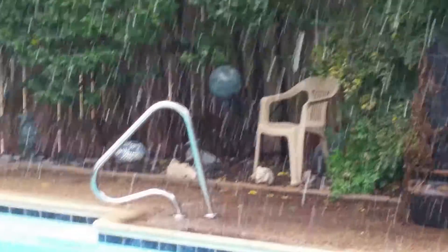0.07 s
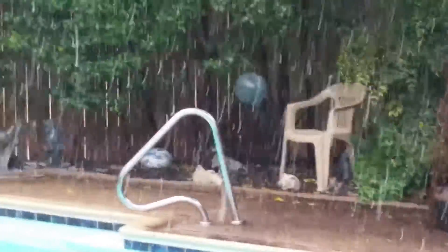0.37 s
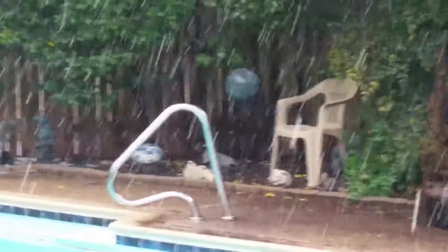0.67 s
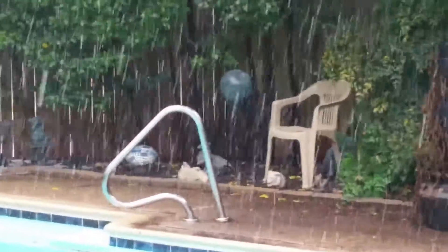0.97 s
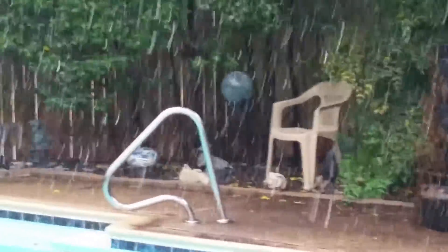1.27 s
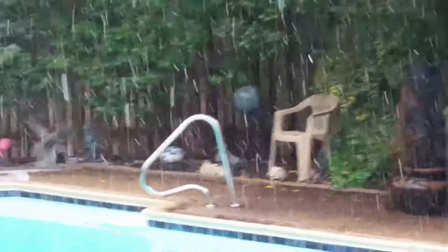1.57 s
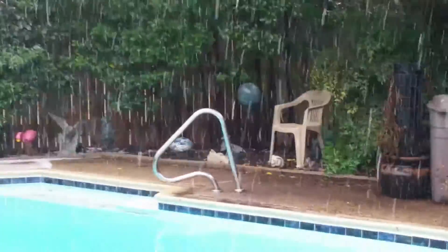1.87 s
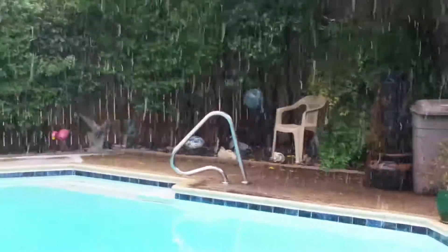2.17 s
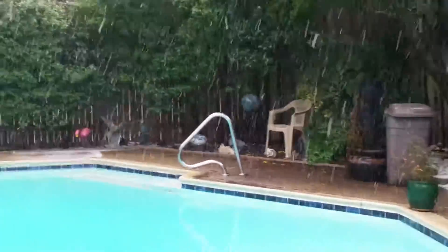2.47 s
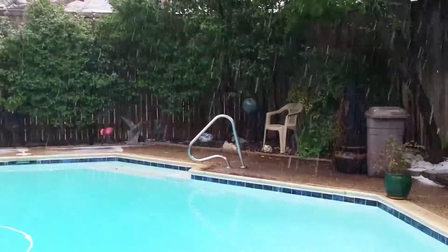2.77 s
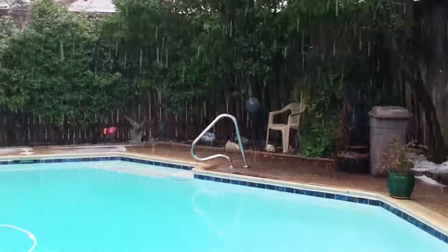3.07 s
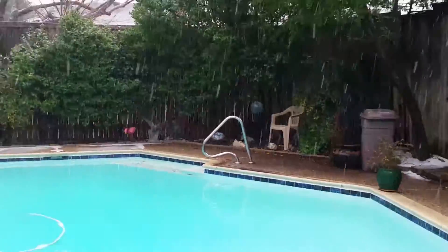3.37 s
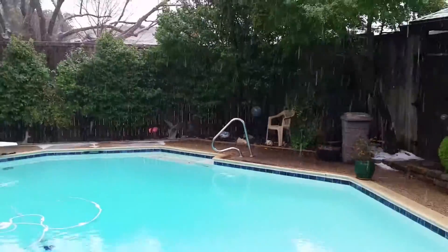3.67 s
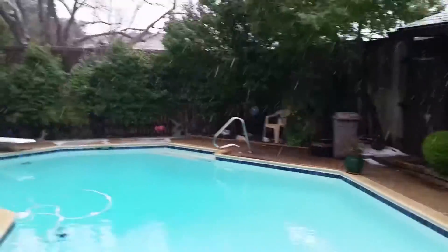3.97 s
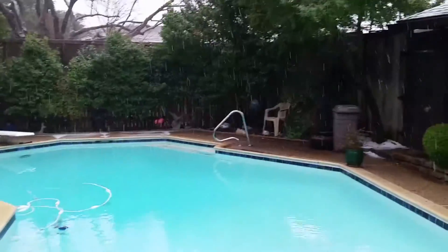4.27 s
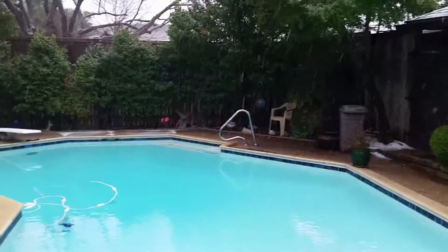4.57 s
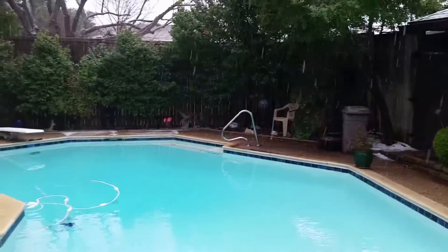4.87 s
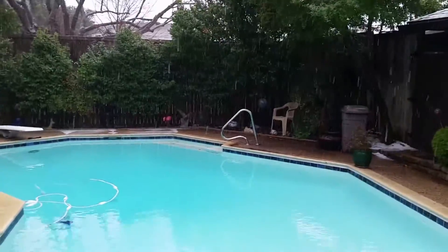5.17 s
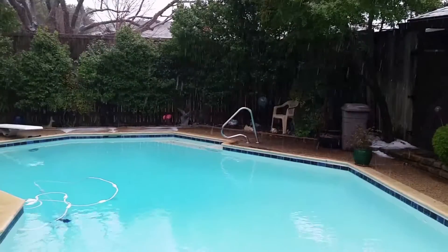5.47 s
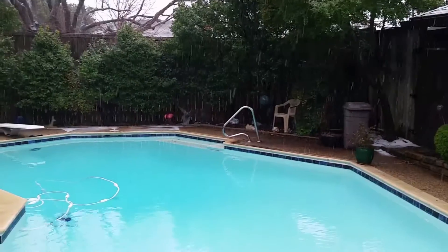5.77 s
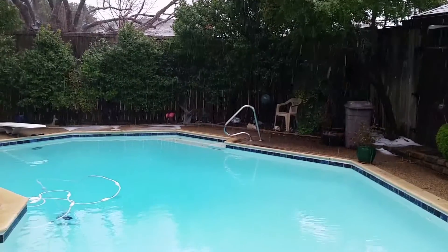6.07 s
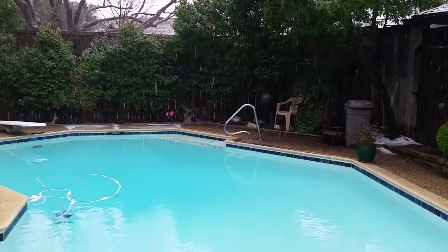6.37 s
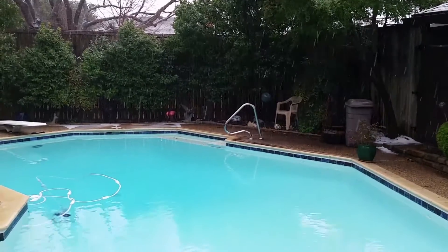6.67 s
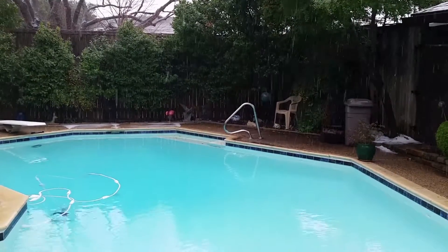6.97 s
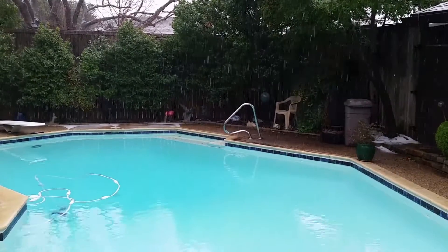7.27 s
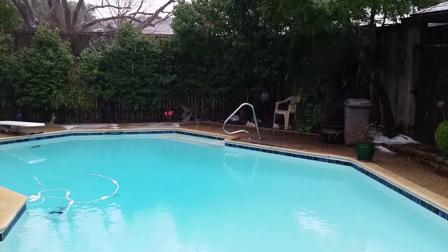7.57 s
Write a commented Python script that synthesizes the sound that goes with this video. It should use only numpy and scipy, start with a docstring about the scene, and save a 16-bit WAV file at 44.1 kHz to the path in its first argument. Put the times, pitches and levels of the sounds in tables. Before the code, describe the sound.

A quiet backyard ambience fades in: tiny ticks and splashes of sleet on leaves and water, with distant motors droning underneath. Two pops hit the microphone on the left, and the hiss dips for about a second. Dull knocks and finger scuffs on the camera follow in the middle and again near the end, while the patter carries on with occasional nearby drips and a faint high whine.

```python
"""A backyard with pool, deck and hedges in wet snow, over the rumble and hum of distant machines.
Flakes patter and splash as tiny damped ticks in a noise wash, ice grains fizz, a few near drops land.
The sound fades in and sinks for a second in the middle. Two drops pop on the left microphone,
a hand bumps and rubs the camera, and a thin electronic whine comes and goes."""
import sys
import numpy as np
from scipy import signal
from scipy.fft import rfft, irfft
from scipy.io import wavfile

SR = 44100
rng = np.random.default_rng(int(sys.argv[2]) if len(sys.argv) > 2 else 0)


def digitize_waveform(pressure):
    """Quantize a signal to 16-bit integers and store it at the path in sys.argv[1].

    Rows of a 2-D input are taken as channels; values are limited to [-1, 1].
    """
    field = np.atleast_2d(pressure).T
    bounded = np.clip(field, -1, 1)
    quanta = np.round(bounded * 32767).astype(np.int16)
    wavfile.write(sys.argv[1], SR, quanta)


N = 344862
T = np.arange(N) / SR

# treble contour that the steady layers follow: t/s, level/dB
HUSH_CONTOUR = np.vstack([[(0.45, -70.5)], [(0.8, -61.5), (2.27, -58.5), (2.28, -62)], [(2.33, -67),
                (2.39, -64.5), (3.04, -80.5), (3.3, -67), (3.74, -61.5), (3.94, -61), (4.33, -59.5),
                (4.6, -59)], [(5.0, -59), (5.3, -57.5), (7.7, -57.5)]])
# distant rumble, relative spectrum: f/Hz, left/dB, right/dB
RUMBLE_SPECTRUM = [(10, -20, 0), (33.6, -4.5, -24), (63, 0.5, -3), (95, -7, 1.5), (119, -3, 0),
                   (163.6, -9.5, -8.5), (197, -13, -10), (230, -5.5, -3), (273, -9.5, -9.5),
                   (371, -18.5, -18.5), (590, -51, -17), (1500, -100, -86)]
# motor tones: f/Hz, level/dB, waver/Hz
HUM_TONES = [(118.3, -52.5, 3.96), (225, -58, 4.17), (341, -63.5, 5.11), (660, -62, 7.96),
             (1997, -67.5, 18), (2280, -69.5, 11.9), (3910, -75.5, 1.65)]
# electronic whine, before hush and pan: t/s, level/dB
WHINE_CONTOUR = [(1.1, -62), (1.38, -75), (2.0, -67), (2.7, -58), (3.05, -68), (3.68, -59), (3.92, -79),
                 (4.5, -72), (4.85, -63), (5.32, -60), (5.45, -70), (5.85, -67), (6.07, -55), (6.35, -74),
                 (6.48, -53.5), (6.65, -74), (7.2, -72), (7.7, -59)]
# soft camera bumps: t/s, left/dB, right/dB, f/Hz
CAMERA_BUMPS = [(1.245, -30, -29.5, 75), (3.596, -21, -50, 102), (3.997, -26, -35, 121),
                (4.56, -33, -31, 215), (4.655, -24, -46, 517), (4.866, -30, -19, 179),
                (6.843, -32, -31, 172), (6.971, -39, -33, 80), (7.69, -30, -26.5, 100)]
# rubbed camera shell, relative spectrum: f/Hz, left/dB, right/dB
SHELL_SPECTRUM = [(59, -29, 5), (195, -6, 10.5), (492, 0.5, -1), (690, -19, -5.5), (1030, -7, -4.5),
                  (1640, -7.5, -13.5), (2300, -23, -28), (3520, -23, -25), (5040, -37, -27),
                  (8000, -55, -35), (12500, -60, -50)]
# finger strokes on the shell: t/s, level/dB, rise/s, hold/s, decay/s, left minus right/dB
FINGER_STROKES = [(4.636, -31, 0.0014, 0.016, 0.016, 8), (4.7, -44, 0.0085, 0.019, 0.027, 0),
                  (4.786, -44.5, 0.024, 0.024, 0.028, 6.5), (4.839, -40, 0.02, 0.042, 0.027, -3.5),
                  (6.8, -47.5, .03, 0.058, .03, 0)]
# drops on the left microphone: t/s, step level/dB, rise/s
PORT_DROPS = [(0.962, -9, 0.0019), (2.3048, 3, 0.00034)]
# icy fizz as each port colours it, relative spectrum: f/Hz, left/dB, right/dB
FIZZ_SPECTRUM = [(1500, -39, -18), (3240, 2, 2), (3930, 3, -1.5), (5500, -5, 0.5), (5920, -36, -11),
                 (6650, 0.5, -0.5), (6960, 3, -4), (9060, 0.5, -9.5), (9300, -5.5, -29), (10650, -0.5, -11),
                 (10980, -19, -5), (12180, 3, 7.5), (14200, -4.5, 7.5), (14600, -3.5, -0.5)]
# fine splashes, before gain and hush: t/s, level/dB
FLURRY_CONTOUR = [(0.6, -57), (2.25, -58), (3.1, -63), (3.35, -52), (3.6, -57.5), (3.95, -53),
                  (4.95, -57.5), (5.27, -49.5), (5.45, -57.5), (5.8, -52.5), (6.5, -58), (6.65, -53.5),
                  (6.9, -62), (7.7, -58.5)]
# single near drops: t/s, level/dB, f/Hz
NEAR_DRIPS = [(1.497, -41, 2830), (3.897, -46, 2900), (4.728, -54, 7200), (5.96, -46, 3310),
              (6.23, -47, 3650), (7.476, -48, 3300), (7.583, -45, 2940)]
# wet flakes on leaves and water, relative spectrum: f/Hz, left/dB, right/dB
PATTER_SPECTRUM = [(100, -32, -20), (283, -6, -5), (495, 2, 1.5), (696, 0.5, -7), (900, -4, -4.5),
                   (1120, -6, -10.5), (1640, -2, -6.5), (2120, -3.5, -25), (2720, -8, -8.5),
                   (2665, -2.5, -4.5), (3090, -15, -33), (4500, -38, -43), (9000, -80, -70)]


def amp(db):
    """Decibels to gain."""
    return 10 ** (np.asarray(db) / 20)


def unit_rms(x):
    """Scales to rms 1."""
    return x / np.sqrt(np.mean(x ** 2) + 1e-20)


def add(mix, start_s, sound):
    """Mixes a stereo sound in at start_s."""
    part = mix[:, round(start_s * SR):][:, :sound.shape[1]]
    part += sound[:, :part.shape[1]]


def drift(rate_hz):
    """Random wander below about rate_hz, rms 1."""
    rolloff = 1 + (np.fft.rfftfreq(N, 1 / SR) / rate_hz) ** 4
    return unit_rms(irfft(rfft(rng.standard_normal(N)) / rolloff, N))


def noise_pair(shared, lag_samples=0):
    """Stereo white noise; a share of the power is common and lags on the right."""
    common = rng.standard_normal(N)
    coherent = np.array([common, np.roll(common, lag_samples)])
    return np.sqrt(shared) * coherent + np.sqrt(1 - shared) * rng.standard_normal((2, N))


def coloured(x, spectrum):
    """Gives each channel its spectrum; mid signal at rms 1."""
    hz, *sides_db = np.transpose(spectrum)
    log_hz = np.log(np.fft.rfftfreq(N, 1 / SR) + 1)
    gains = amp([np.interp(log_hz, np.log(hz), side_db) for side_db in sides_db])
    out = irfft(rfft(x) * gains, N)
    return out / out.mean(0).std()


def hush(follow, full_db=-57.5):
    """Gain that follows a share of the treble contour's dips below full_db."""
    return amp(follow * (np.interp(T, *np.transpose(HUSH_CONTOUR)) - full_db))


def rumble(gain_db=-41.0, lumpy_db=0.98):
    """Far traffic and light wind, nearly alike at both microphones."""
    roar = coloured(noise_pair(shared=0.86, lag_samples=17), RUMBLE_SPECTRUM)
    return amp(gain_db + lumpy_db * drift(3.0)) * hush(follow=0.43) * roar


def hum(waver_db=2.5, balance_db=2.0):
    """Wavering tones of a distant motor; higher ones sink deeper with the hush."""
    tones = np.zeros(N)
    for hz, db, waver_hz in HUM_TONES:
        follow = np.interp(hz, [HUM_TONES[0][0], HUM_TONES[-1][0]], [0.38, 0.75])
        turns = np.cumsum(hz + waver_hz * drift(7.99)) / SR
        tones += amp(db + waver_db * drift(5.3)) * np.sin(2 * np.pi * turns) * hush(follow)
    return np.sqrt(2) * tones * amp([[-balance_db], [balance_db]])


def whine(hz=13921, wander_hz=5, flutter_db=2.3, left_db=-5, right_db=7):
    """Thin fluttering tone of the electronics, mostly right."""
    turns = np.cumsum(hz + wander_hz * drift(3.5)) / SR
    level_db = np.interp(T, *np.transpose(WHINE_CONTOUR)) + flutter_db * drift(19)
    tone = np.sqrt(2) * np.sin(2 * np.pi * turns)
    return amp(level_db) * hush(follow=1) * tone * amp([[left_db], [right_db]])


def bump(peak_s, left_db, right_db, hz, width_cycles=0.68):
    """Dull push on the camera, no ring. Returns start time and sound."""
    t = np.arange(-2048, 2048) / SR
    push = -np.cos(2 * np.pi * hz * t) * np.exp(-(t * hz / width_cycles) ** 2)
    return peak_s + t[0], amp([[left_db], [right_db]]) * push


def scuffs(rough_db=0.5):
    """Skin slips unevenly on the camera shell."""
    rub = coloured(noise_pair(shared=0.12) * amp(rough_db * drift(170)), SHELL_SPECTRUM)
    strokes = np.zeros((2, N))
    for start_s, db, rise_s, hold_s, decay_s, pan_db in FINGER_STROKES:
        attack = np.clip((T - start_s) / rise_s, 0, 1)
        release = np.exp(-np.maximum(T - start_s - rise_s - hold_s, 0) / decay_s)
        strokes += amp([[db + pan_db / 2], [db - pan_db / 2]]) * attack * release
    return rub * strokes


def brush(peak_s=4.835, width_s=0.047, db=-51, resonance_hz=(11800, 14400)):
    """A fingertip brushes the right port, which hisses at its resonance."""
    hiss = signal.lfilter(*signal.butter(2, resonance_hz, "band", fs=SR), rng.standard_normal(N))
    touch = np.exp(-((T - peak_s) / width_s) ** 2)
    return np.array([np.zeros(N), amp(db) * unit_rms(hiss) * touch])


def pop(step_db, rise_s, bass_cut_hz=101, ring_hz=12800, ring_s=0.00007):
    """A drop seals the left port: a pressure step, high-passed to a spike and undershoot."""
    t = np.arange(2048) / SR
    step = (1 - np.cos(np.pi * np.minimum(t / rise_s, 1))) / 2
    spike = signal.lfilter(*signal.butter(2, bass_cut_hz, "high", fs=SR), step)
    ring_gain = 0.65 * np.diff(step).max()  # a faster drop rings the port harder
    ring = ring_gain * np.cos(2 * np.pi * ring_hz * t) * np.exp(-t / ring_s)
    return amp(step_db) * np.array([spike + ring, np.zeros_like(spike)])


def impacts(per_s, spread_db, band_hz, decay_cycles, patches=32):
    """Tiny damped ticks; each patch of ground has its own pitch and direction."""
    out, t = np.zeros((2, N)), np.arange(512) / SR
    for hz in rng.permutation(np.geomspace(*band_hz, patches)):
        sizes = amp(spread_db * np.minimum(rng.exponential(1, N), 4.5)) * rng.choice([-1, 1], N)
        hits = sizes * (rng.random(N) < per_s / patches / SR)
        tick = np.sqrt(hz) * np.sin(2 * np.pi * hz * t) * np.exp(-t * hz / decay_cycles)
        ticks = signal.oaconvolve(hits, tick)[:N]
        lag_samples = rng.integers(-18, 19)
        out += [ticks, np.roll(ticks, lag_samples)]
    return unit_rms(out)


def finger_shade(x, notch_hz=5700, width_hz=520, depth_db=-9, shift_s=4.6, crossfade_s=0.1):
    """A finger beside the ports notches the treble until the grip shifts."""
    hz = np.fft.rfftfreq(N, 1 / SR)
    notch = amp(depth_db * np.exp(-((hz - notch_hz) / width_hz) ** 2))
    hollow = irfft(rfft(x) * notch, N)
    uncovered = np.clip((T - shift_s) / crossfade_s + 0.5, 0, 1)
    return hollow + (x - hollow) * uncovered


def fizz(gain_db=-54.0, grain_db=-8):
    """Ice grains tick on the deck within a smooth hiss."""
    ticks = impacts(per_s=2000, spread_db=3.0, band_hz=(3100, 10100), decay_cycles=1.2)
    hiss = coloured(noise_pair(shared=0.03) + amp(grain_db) * ticks, FIZZ_SPECTRUM)
    return amp(gain_db) * hush(follow=1.05) * finger_shade(hiss)


def flurry(gain_db=-1, band_hz=(1900, 2420), right_db=-14, flutter_db=1.8):
    """Fine narrow-band splashes on the left; they swell, sink and flutter."""
    ticks = impacts(per_s=400, spread_db=1.5, band_hz=(1815, 2500), decay_cycles=2.0, patches=8)
    splashes = noise_pair(shared=0.12) + 0.5 * ticks
    band = signal.lfilter(*signal.butter(2, band_hz, "band", fs=SR), splashes) * amp([[0], [right_db]])
    level_db = gain_db + np.interp(T, *np.transpose(FLURRY_CONTOUR)) + flutter_db * drift(22)
    return amp(level_db) * hush(follow=0.69) * band / band.mean(0).std()


def drip(db, hz, edge_ratio=1.19, decay_s=0.006):
    """A near drop splashes: a short noise burst around one pitch."""
    t = np.arange(2048) / SR
    bandpass = signal.butter(4, [hz / edge_ratio, hz * edge_ratio], "band", fs=SR)
    splash = unit_rms(signal.lfilter(*bandpass, rng.standard_normal((2, len(t)))))
    return amp(db) * splash * np.exp(-t / decay_s)


def patter(gain_db=-48.5, grain_db=-7, swell_db=0.42):
    """Near flakes tap the leaves, mostly left; far ones merge into a wash."""
    taps = impacts(per_s=2000, spread_db=0.0, band_hz=(715, 3220), decay_cycles=1.26)
    wash = noise_pair(shared=0.59, lag_samples=18)
    flakes = coloured(wash + amp(grain_db) * taps, PATTER_SPECTRUM)
    return amp(gain_db + swell_db * drift(4.5)) * hush(follow=0.57) * flakes


def scene():
    """Machines, camera noises and snow, summed in stereo."""
    mix = rumble() + hum() + whine() + scuffs() + brush() + fizz() + flurry() + patter()
    for row in CAMERA_BUMPS:
        add(mix, *bump(*row))
    for start_s, step_db, rise_s in PORT_DROPS:
        add(mix, start_s, pop(step_db, rise_s))
    for start_s, db, hz in NEAR_DRIPS:
        add(mix, start_s, drip(db, hz))
    return mix


def record(dry, start_s=0.41, fade_s=0.24, ceiling=0.97, cutoff_hz=14600):
    """Input stage: silence, fade-in, hard limit, steep low-pass."""
    faded = dry * np.clip((T - start_s) / fade_s, 0, 1)
    limited = np.clip(faded, -ceiling, ceiling)
    lowpass = signal.firwin(1023, cutoff_hz, window=("kaiser", 9), fs=SR)
    return signal.oaconvolve(limited, lowpass[None], "same")


dry = scene()
out = record(dry)
digitize_waveform(out)
```